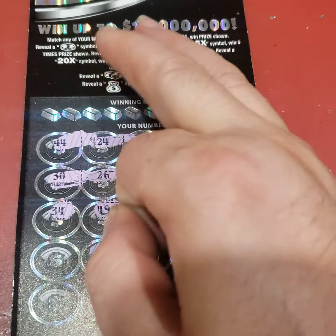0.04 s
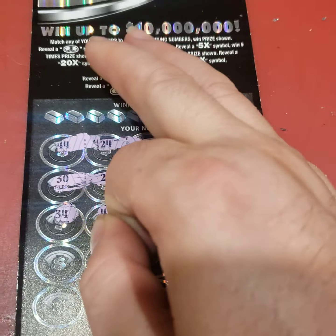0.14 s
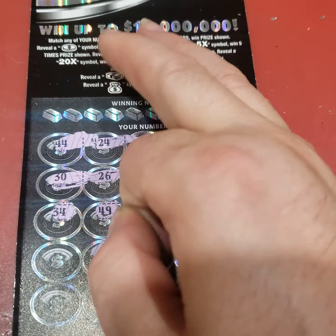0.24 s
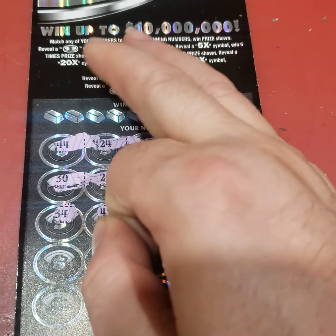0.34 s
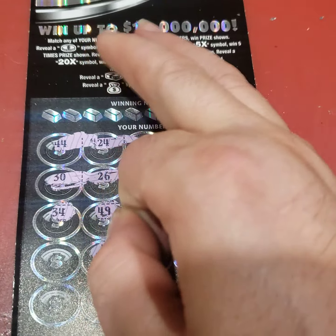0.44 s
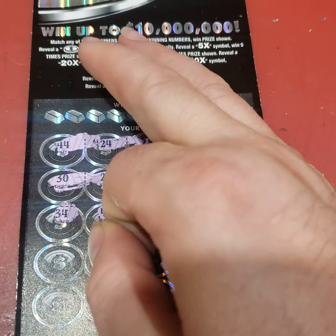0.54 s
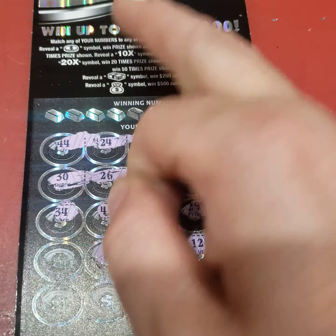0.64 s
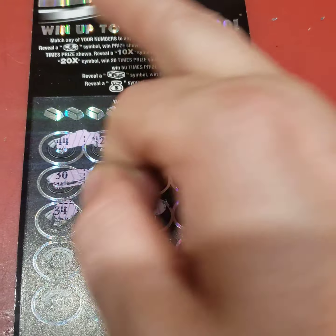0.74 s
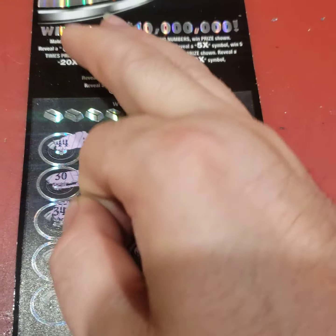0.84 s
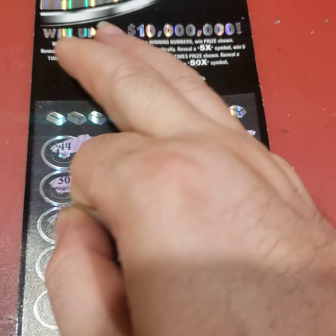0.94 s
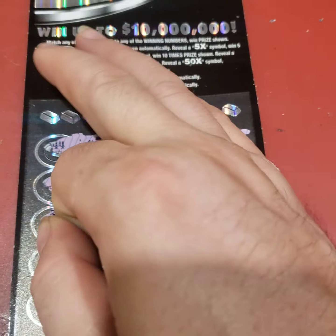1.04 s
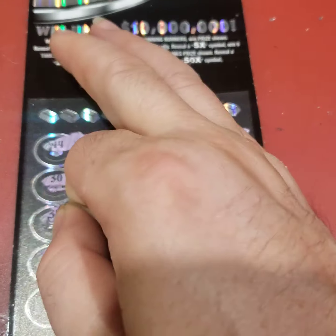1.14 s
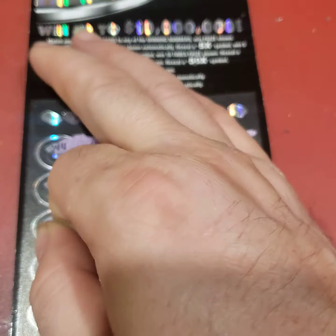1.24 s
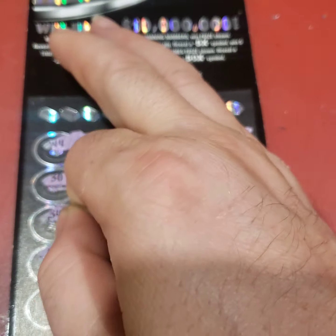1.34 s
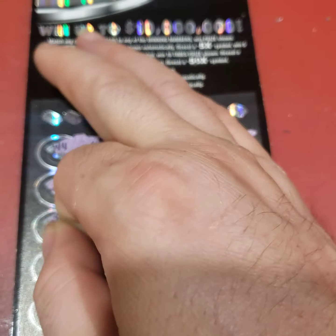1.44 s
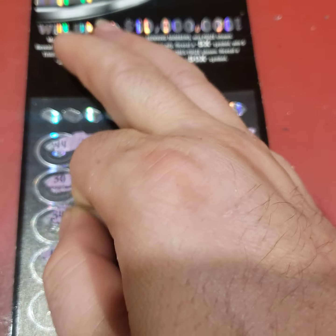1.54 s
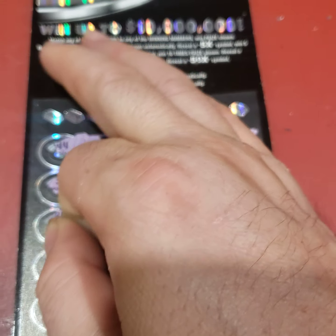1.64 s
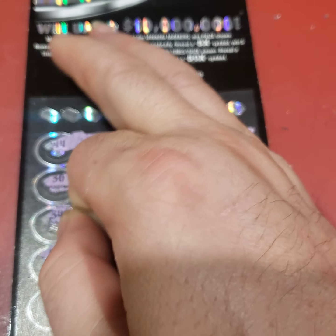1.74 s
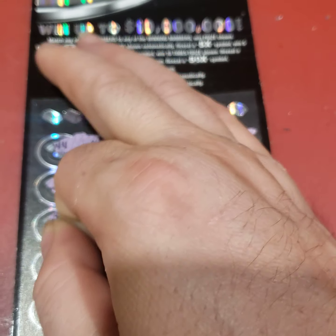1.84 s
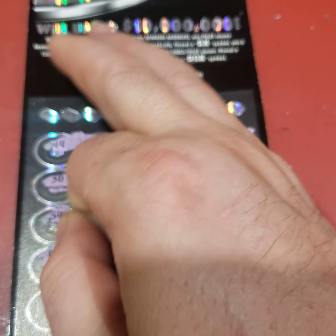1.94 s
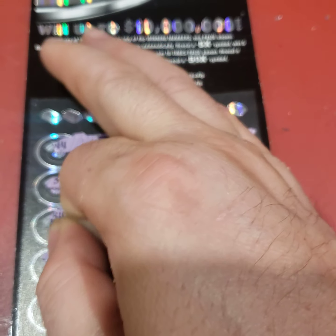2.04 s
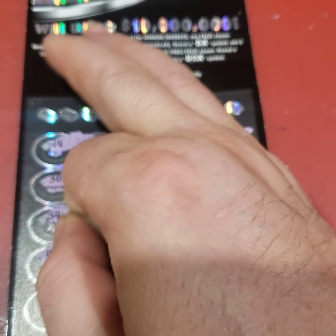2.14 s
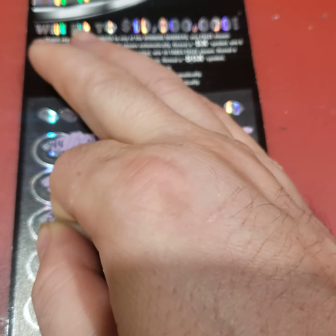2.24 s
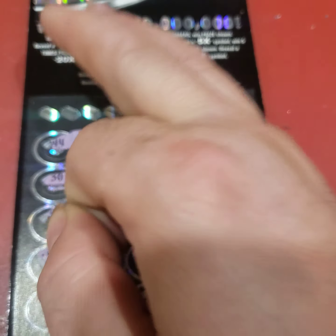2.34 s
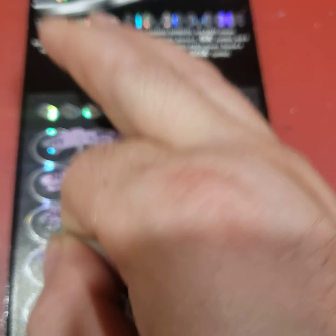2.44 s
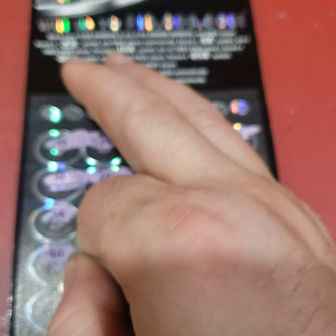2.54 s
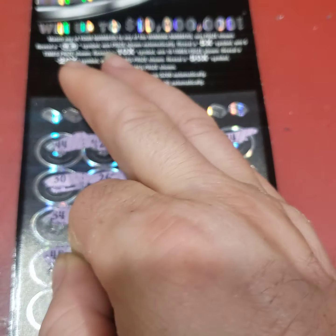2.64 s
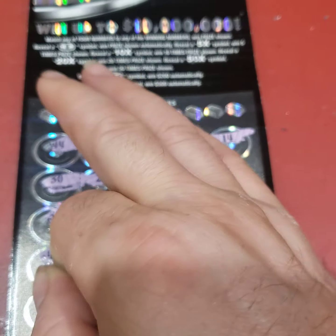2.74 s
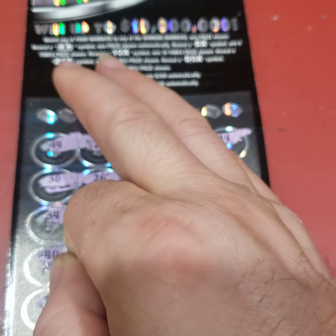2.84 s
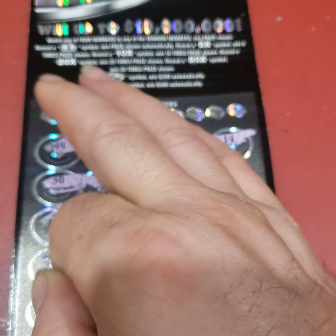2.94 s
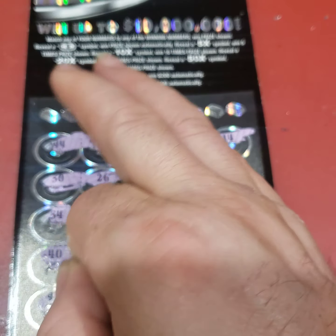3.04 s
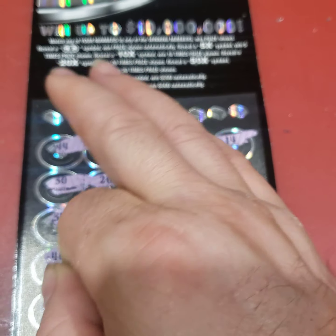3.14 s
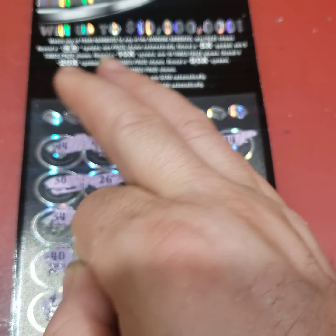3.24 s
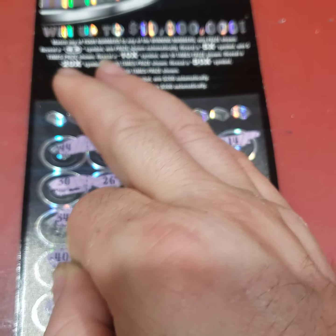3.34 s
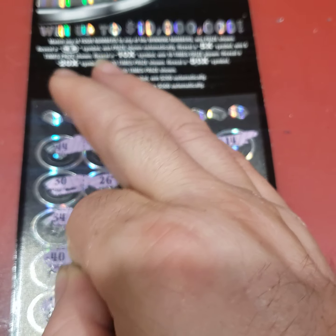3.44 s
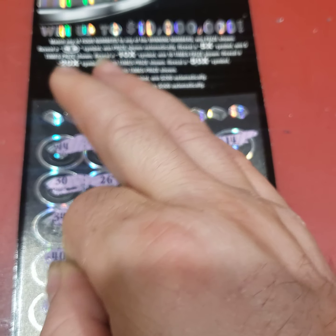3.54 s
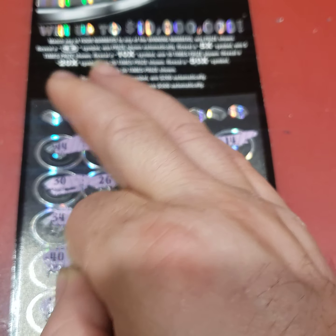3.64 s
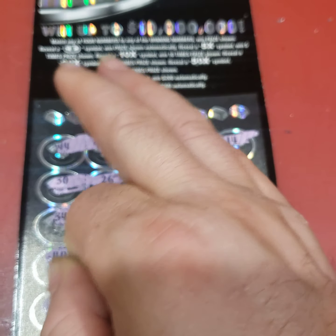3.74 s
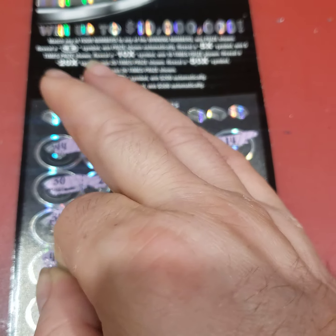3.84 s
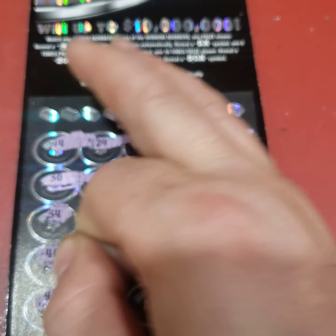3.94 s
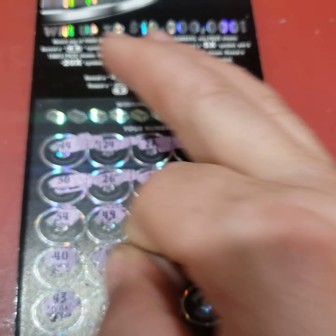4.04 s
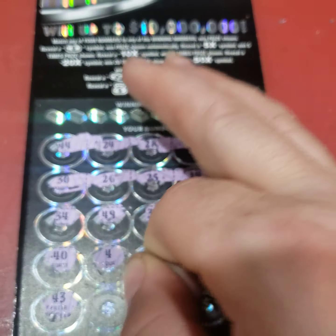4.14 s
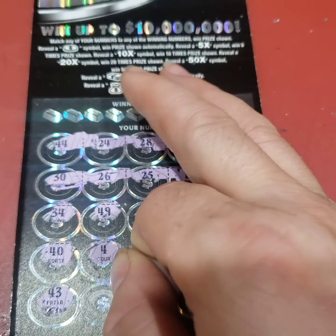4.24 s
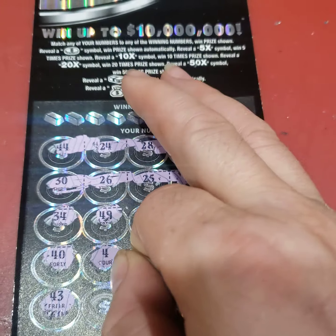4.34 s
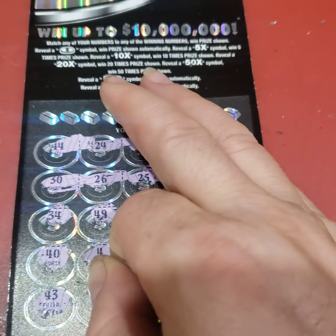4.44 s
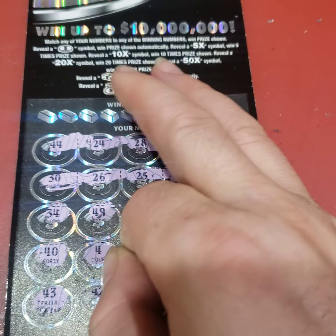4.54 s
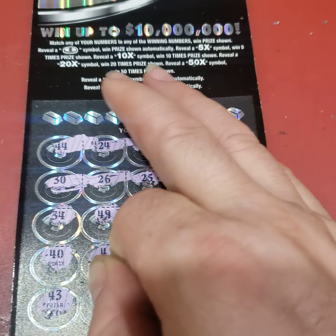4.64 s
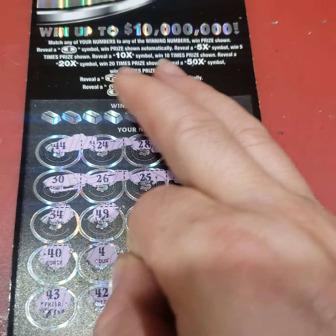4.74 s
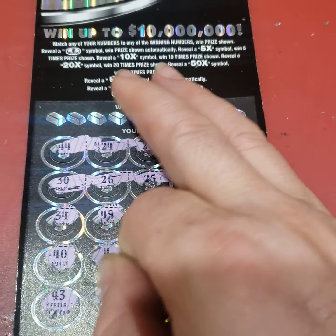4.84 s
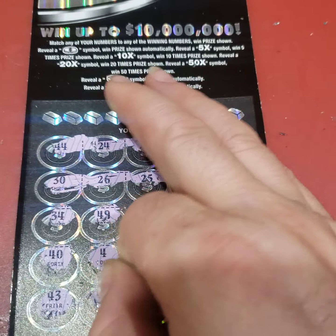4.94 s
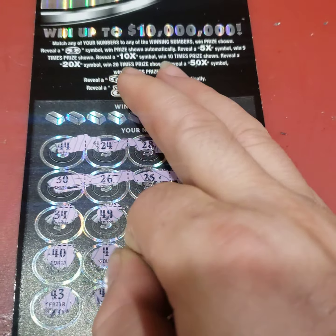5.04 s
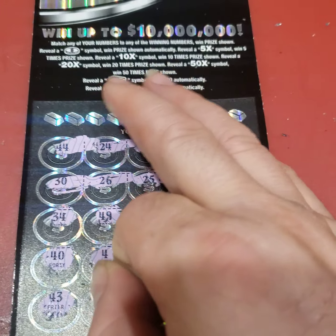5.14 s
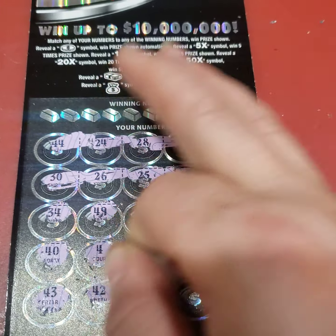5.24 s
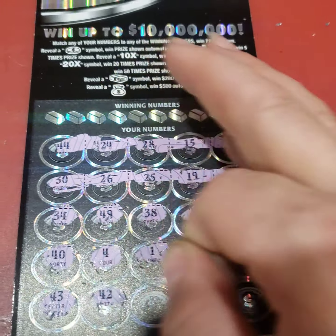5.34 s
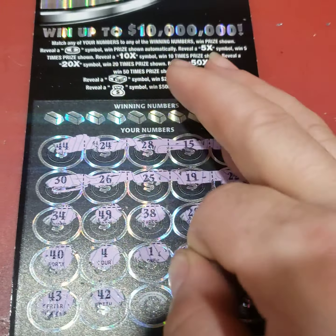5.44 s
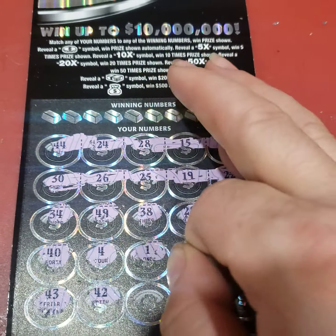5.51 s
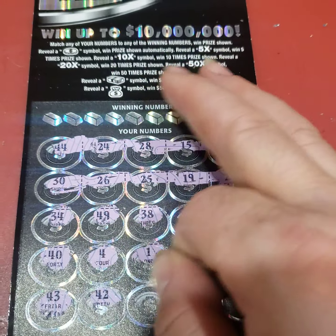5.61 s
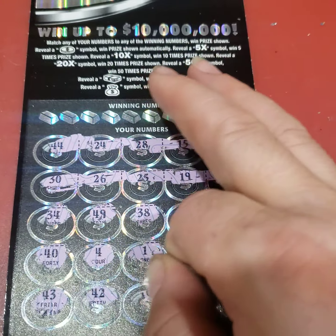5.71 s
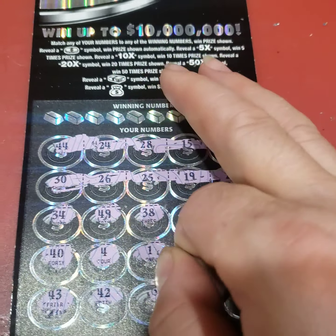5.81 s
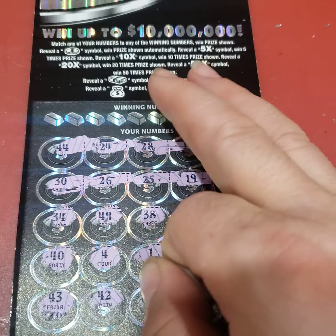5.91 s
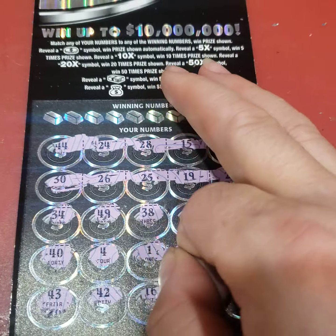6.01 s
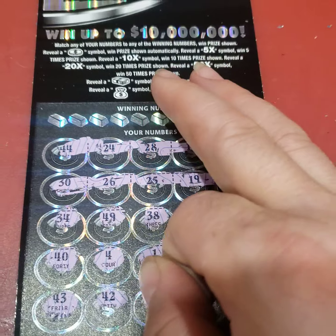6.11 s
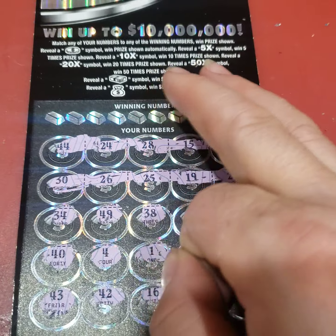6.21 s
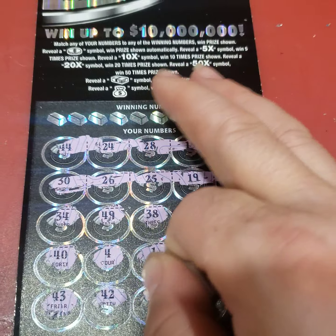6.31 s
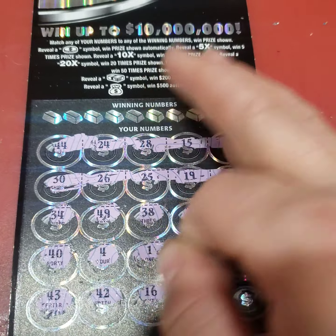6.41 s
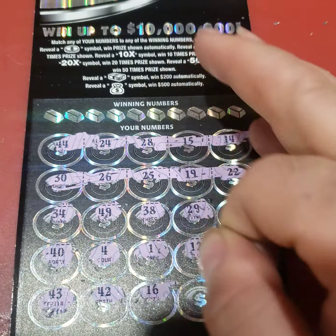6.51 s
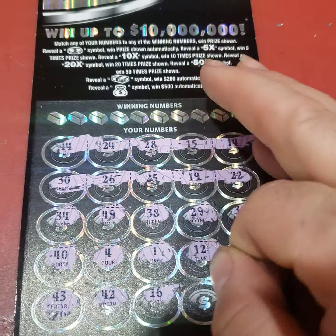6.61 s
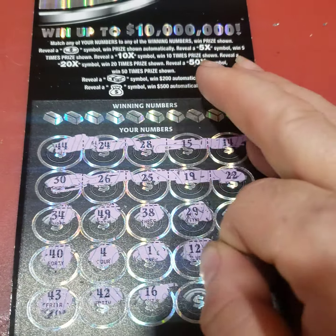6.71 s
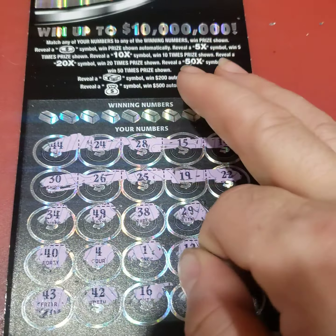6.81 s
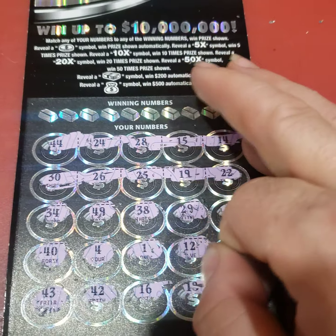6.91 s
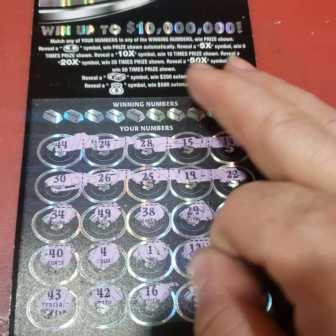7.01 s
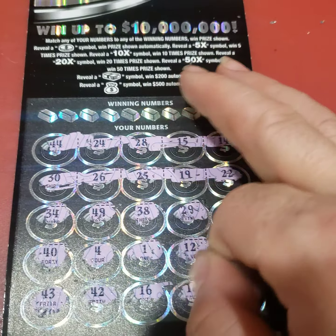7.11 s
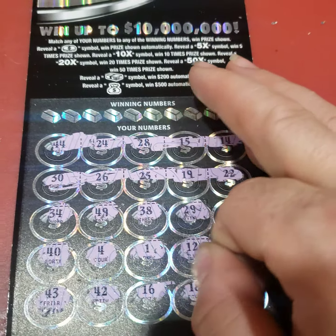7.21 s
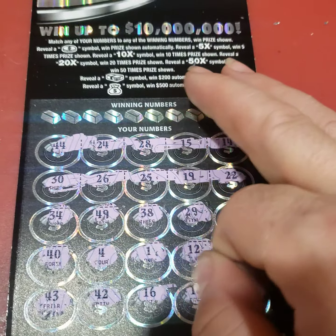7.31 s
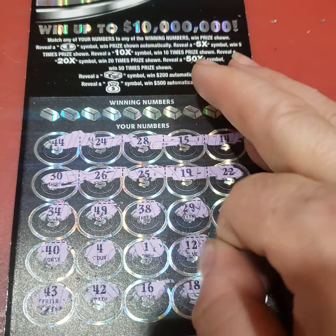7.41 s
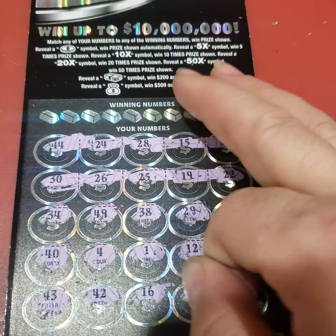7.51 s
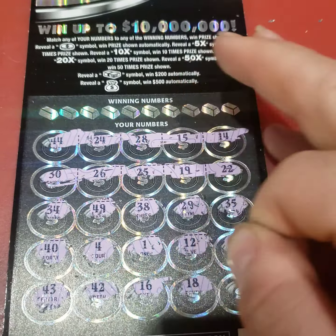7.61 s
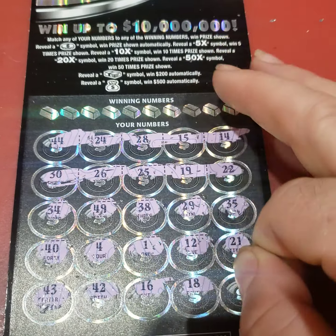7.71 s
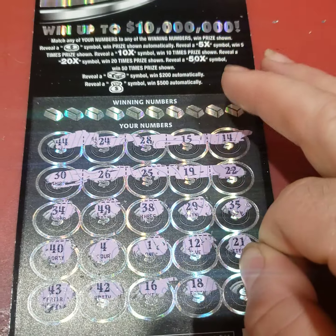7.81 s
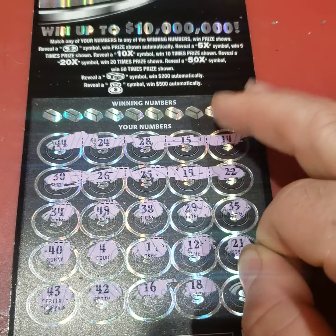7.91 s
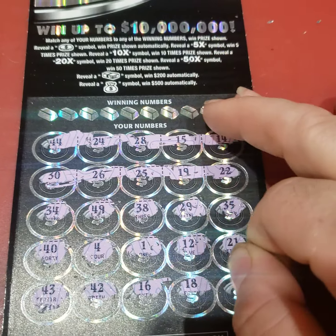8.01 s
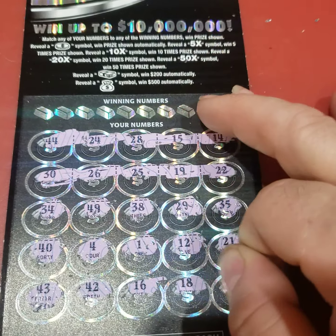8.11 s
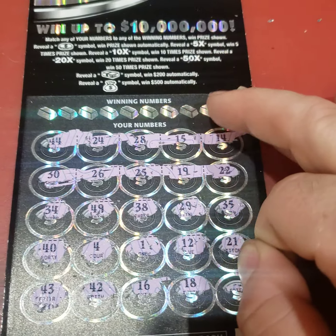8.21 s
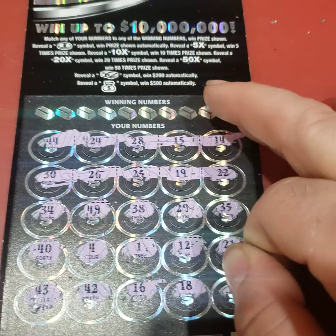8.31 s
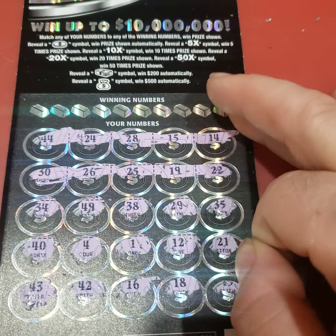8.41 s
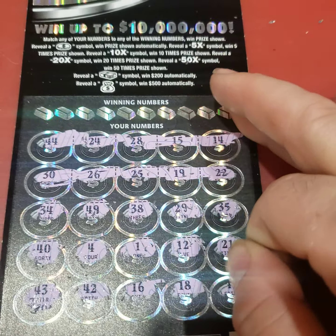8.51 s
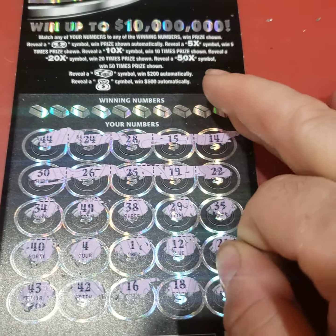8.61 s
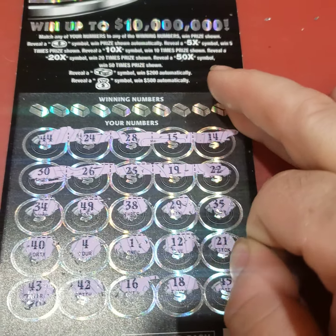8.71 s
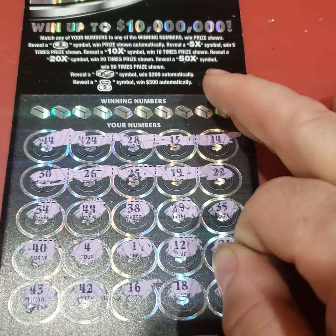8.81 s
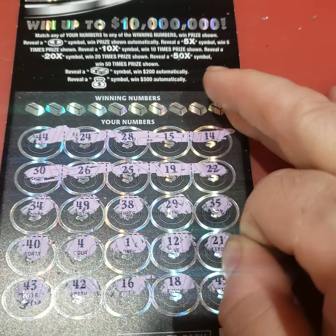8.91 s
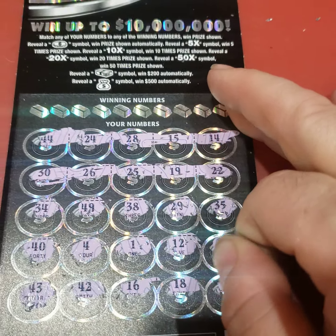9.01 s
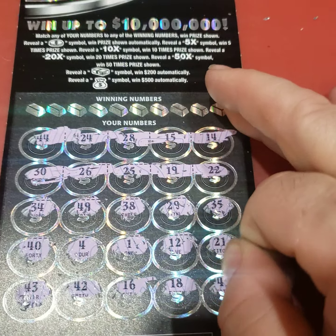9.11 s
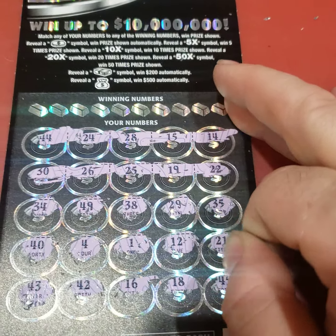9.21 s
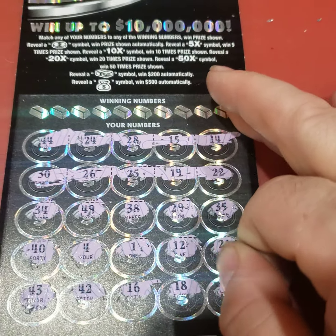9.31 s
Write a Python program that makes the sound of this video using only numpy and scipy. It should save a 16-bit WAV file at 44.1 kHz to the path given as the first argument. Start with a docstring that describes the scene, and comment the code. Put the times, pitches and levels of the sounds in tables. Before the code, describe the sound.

A coin scrapes a scratch card on a table, close in stereo, in a small quiet room with a short echo and faint low hum. Scratching is already under way and stops near 0.6 s. Further bouts run about 1.0-2.3, 2.65-3.9, 4.4-5.2, 5.6-6.4, 6.8-7.5 and 8.1-9.3 s, each made of rapid alternating strokes of roughly a tenth of a second. Every stroke shakes a low, woody table rumble under a dry rasp and thin crumbling hiss, brightest on the left, with some edge ringing. The hiss is stronger around 5 and 6.2 s. Brief judders start bouts near 2.7, 5.7, 6.8 and 8.1 s. Little knocks and fine clicks are scattered throughout. Soft hand swishes come near 0.1, 3.4, 5.3 and 6.1 s, with dull thuds at 5.1, 6.15 and 6.4 s. The last bout is patchier, with weak strokes between stronger ones.

```python
"""A coin scrapes the coating off a scratch card on a table, in quick to-and-fro strokes, column after column.
Random tiny slips shake the table top and make the card rasp; the crumbling coating hisses, mostly on the left.
The coin rings at its edge, knocks as it lands, judders as it digs in and clicks over flakes.
The hand thuds softly and swishes over the card; a small room echoes and hums quietly."""
import sys
import numpy as np
from scipy import signal
from scipy.fft import rfft, irfft, next_fast_len
from scipy.io import wavfile
from scipy.ndimage import uniform_filter1d

SR = 44100
rng = np.random.default_rng(int(sys.argv[2]) if len(sys.argv) > 2 else 0)


def generate_wav(signal):
    """Clip the signal to [-1, 1] and save it as 16-bit WAV at the path in sys.argv[1]."""
    frames = np.transpose(np.atleast_2d(signal))
    scaled = np.clip(frames, -1, 1) * 32767
    pcm = np.round(scaled).astype(np.int16)
    wavfile.write(sys.argv[1], SR, pcm)


N = 412758
TIME = np.arange(N) / SR
SIZE = next_fast_len(N + SR // 2, True)  # leaves room for the echoes to die away
HZ = np.maximum(np.fft.rfftfreq(SIZE, 1 / SR), 1)
CUTOFF_HZ = 15900


def from_db(db):
    """Turn decibels into gain."""
    return 10 ** (np.asarray(db) / 20)


def rms_one(x):
    """Scale to an rms of 1."""
    return x / np.sqrt(np.mean(x ** 2))


def over_hz(points):
    """Join (f/Hz, value) points by straight lines on a log-frequency axis."""
    hz, value = np.transpose(points)
    return np.interp(np.log(HZ), np.log(hz), value)


def body(spectrum):
    """Make a causal (minimum-phase) response of unit power that falls away beyond the ends of the spectrum."""
    low_skirt = np.minimum(HZ / spectrum[0][0], 1) ** 2
    high_skirt = np.minimum(spectrum[-1][0] / HZ, 1) ** 4
    gain = rms_one(from_db(over_hz(spectrum)) * low_skirt * high_skirt)
    cepstrum = irfft(np.log(gain), SIZE)
    # folding the cepstrum onto positive times makes the response causal
    cepstrum[1:SIZE // 2] *= 2
    cepstrum[SIZE // 2 + 1:] = 0
    return np.exp(rfft(cepstrum))


def drift(per_s):
    """Wander at random with rms 1, through this many turning points a second."""
    knots = rng.standard_normal(SR // 10)
    return rms_one(np.interp(TIME * per_s, np.arange(len(knots)), knots))


def filtered(x, order, hz, kind):
    """Apply a Butterworth filter."""
    return signal.sosfilt(signal.butter(order, hz, kind, fs=SR, output="sos"), x)


# spectrum of the quiet room: (f/Hz, relative level/dB per Hz)
AIR = [(30, -20.5), (58, -3.5), (105, -11.5), (212, -0.5), (489, -11.5), (775, -26), (1330, -35),
       (2400, -43), (8360, -49), (14800, -34.5), (16000, -33)]
AIR_DB = -55


def room_air():
    """The quiet room is steady noise with most of its power in the low hum."""
    return from_db(AIR_DB) * rfft(rng.standard_normal((2, SIZE))) * body(AIR)


def room(t60, gap_s):
    """Diffuse reflections are decaying noise, different on each side, after a short gap."""
    age = TIME[:SR // 2]
    tail = rng.standard_normal((2, SR // 2))
    fade = from_db(-60 * age / t60) * (age > gap_s)
    return rfft(tail * fade / np.linalg.norm(fade), SIZE)


def reflections(sound, t60, gap_s):
    """The moving hand keeps shifting the room's reflections between two patterns."""
    turn = np.pi / 2 * drift(per_s=9)
    one, other = (irfft(sound * room(t60, gap_s), SIZE)[:, :N] for _ in range(2))
    return rfft(one * np.cos(turn) + other * np.sin(turn), SIZE)


# left minus right level, before each sound takes its share: (f/Hz, level/dB)
BALANCE_DB = [(330, -2.5), (500, 4), (770, 11), (1600, -1.5), (4100, 19.5), (6400, 30), (10000, 11.5),
              (14500, 22.5)]
# likeness of left and right: (f/Hz, correlation)
LIKENESS = [(60, 0.59), (130, 0.96), (330, 0.95), (600, 1), (1200, 0.62), (2000, 0.47), (3300, 0.011)]
# how far the left microphone's phase is ahead: (f/Hz, phase/rad)
LEAD = [(150, 0.052), (350, 0.66), (520, 1.77), (780, 0.11), (1030, 1.67), (1460, 0.12), (1810, 0.96)]


def microphones(families, lean_share):
    """Two microphones hear the two families of modes in different mixtures; the left one is brighter."""
    alike, lead = np.clip(over_hz(LIKENESS), -1, 1), over_hz(LEAD)
    lean = from_db(lean_share * over_hz(BALANCE_DB) / 2)
    mid = np.sqrt(1 + alike) * families[0]
    side = np.sqrt(1 - alike) * families[1]
    left = (mid + side) * lean * np.exp(1j * lead)
    right = (mid - side) / lean
    # keeps the power of the sum of both sides steady
    return np.array([left, right]) / np.sqrt((lean ** 2 + lean ** -2 + 2 * alike * np.cos(lead)) / 2)


# the hand slides over the card, and the first row adds a brief bright swell of noise to the opening stroke:
# (start t/s, end t/s, level/dB before a common boost)
SWISHES = [(0.045, 0.117, -55.5), (3.39, 3.532, -58.5), (5.308, 5.42, -65), (6.022, 6.186, -54)]
# spectrum of skin on card: (f/Hz, relative level/dB per Hz)
SKIN = [(600, 22), (1700, 2.5), (2900, 7.5), (3800, -4), (5500, 0.5)]


def swishes(level_db):
    """Skin gliding over the card gives a soft, smooth swell of noise."""
    swell = 0
    for start, end, db in SWISHES:
        rise_and_fall = np.interp(TIME, [start, (start + end) / 2, end], [0, 1, 0])
        swell = swell + from_db(db + level_db) * rise_and_fall ** 0.57
    return rfft(swell * rng.standard_normal((2, N)), SIZE) * body(SKIN)


# the heel of the hand thuds on the table: (t/s, level/dB at the top of the swell)
THUDS = [(5.14, -44), (6.145, -38.5), (6.368, -40.5)]


def thuds(low_hz, high_hz, rise_s):
    """The soft heel of the hand makes low noise in the table that swells and dies away."""
    rumble = filtered(rng.standard_normal((2, N)), 2, [low_hz, high_hz], "band")
    swell = 0
    for s, db in THUDS:
        age = np.maximum(TIME - s, 0) / rise_s
        swell = swell + from_db(db) * age * np.exp(1 - age)
    return rms_one(rumble) * swell


# the coin's edge snaps over a flake or the card crackles: (t/s, level/dB before a common cut, centre f/Hz)
TICKS = [(0.653, -25, 14400), (0.6955, -23.5, 15200), (0.867, -41, 4000), (0.9532, -40, 5500),
         (2.384, -23, 14900), (2.558, -33, 3460), (2.636, -36.5, 6330), (3.183, -17.5, 14750),
         (3.2907, -17.5, 14300), (3.418, -23, 14300), (4.0466, -17, 13700), (4.217, -30, 5200),
         (4.336, -25, 14700), (5.546, -36, 6660), (6.515, -27, 15100), (6.707, -39.5, 5400),
         (7.4832, -28, 4100), (7.763, -29, 15400), (7.7788, -27, 6640), (8.1348, -27, 9340),
         (8.3492, -24.5, 11270)]


def ticks(level_db, rise_s, decay_s, octave_wide_hz, low_hz, ring_hz, ring_q, ring_db):
    """Each snap is a short noise burst round one pitch, the higher the broader; the card rings briefly with it."""
    out, age = np.zeros((2, N)), TIME[:SR // 50]
    for s, db, hz in TICKS:
        half_width = 2 ** (hz / octave_wide_hz / 2)  # a frequency ratio
        edges = np.minimum([hz / half_width, hz * half_width], .45 * SR)
        swell = (1 - np.exp(-age / rise_s)) * np.exp(-age / decay_s)
        burst = filtered(rng.standard_normal((2, len(age))) * swell, 1, edges, "band")
        at = int(s * SR)
        out[:, at:at + len(age)] += from_db(db + level_db) * rms_one(burst)
    ring = signal.lfilter(*signal.iirpeak(ring_hz, ring_q, fs=SR), out)
    return filtered(out + from_db(ring_db) * ring, 2, low_hz, "high")


# the coin lands or bites: (t/s, level/dB before a common boost)
KNOCKS = [(0.17, -33), (0.365, -32.5), (0.971, -34.5), (2.085, -31), (2.667, -37.5), (3.177, -27),
          (3.599, -30.5), (4.345, -41.5), (4.431, -36.5), (4.876, -34), (5.933, -30.5), (6.647, -38.5),
          (6.715, -40), (7.053, -31), (7.772, -37), (8.061, -38), (9.282, -34)]


def knocks(level_db, bounce_s, bounce_db):
    """The coin gives one push as it lands, and a slightly weaker rebound a few milliseconds later."""
    force = np.zeros((2, N))
    chances = rng.uniform(-0.97, 1, (len(KNOCKS), 2))
    for (s, db), (turn, late) in zip(KNOCKS, chances):
        push = from_db(db + level_db) * np.array([1, turn])  # turn: share of the second family of modes
        rebound_s = s + bounce_s * (1 + late / 2)
        force[:, int(s * SR)] -= push
        force[:, int(rebound_s * SR)] -= push * from_db(bounce_db)
    return force


# the coin judders as it digs into a fresh column: (start t/s, length t/s, level/dB before a common boost)
JUDDERS = [(2.728, 0.064, -27), (5.658, 0.054, -28), (6.792, 0.091, -24.5), (8.077, 0.042, -23.5)]


def judders(slip_hz, wander, level_db):
    """The coin sticks and slips almost regularly, near the table's main resonance, as its effort fades."""
    cycles = np.floor(np.cumsum(slip_hz * np.exp(wander * drift(per_s=70))) / SR)
    pushes = np.diff(cycles, prepend=0) * (1 + rng.standard_normal((2, N)) / 3)  # one per cycle
    effort = 0
    for s, length, db in JUDDERS:
        bite = np.interp(TIME, [s, s + length / 10, s + length], [0, 1, 0])
        effort = effort + from_db(db + level_db) * bite
    return pushes * effort


def slips(per_s, spread_db, steady_s):
    """Random tiny slips drive two families of modes; the hand holds their mean force steady."""
    born = rng.random(N) < per_s / SR
    force = born * from_db(spread_db * rng.exponential(1, N)) * rng.standard_normal((2, N))
    power = uniform_filter1d(force ** 2, int(steady_s * SR), axis=-1)
    return force / np.sqrt(np.abs(power) + 1e-5)


def edge_echo(force, delay_s, wander, strength):
    """Bending waves return from the card's edge; their delay drifts, so the colour keeps shifting."""
    late = TIME - delay_s * np.exp(wander * drift(per_s=9))
    back = np.array([np.interp(late, TIME, family) for family in force])
    return (force + strength * back) / np.sqrt(1 + strength ** 2)


# the table top under the hand: (f/Hz, relative level/dB per Hz)
TABLE = [(40, -39.5), (60, -10.5), (76, -20), (94, -9), (120, -16), (195, -8.5), (235, -3.5), (275, -6),
         (325, -3.5), (362, 1.5), (430, -3), (480, -12.5), (600, -18), (800, -44.5)]


def table_top(friction, level, blows):
    """Friction and blows shake the table top, which sounds in its own low modes."""
    rubbing = edge_echo(friction, delay_s=0.00714, wander=0.198, strength=0.34) * level
    return rfft(rubbing + blows, SIZE) * body(TABLE)


# where the coin works: (t/s, place across the card: 0 left, 1 middle, 2 right)
PLACE = [(.7, .6), (.95, 0), (2.5, 0), (2.8, .4), (4, .4), (4.4, 1), (5.4, 1), (5.6, 1.8), (6.4, 1.8),
         (6.8, 2)]


def coin_place():
    """The coin moves across the card along straight lines in time."""
    return np.interp(TIME, *np.transpose(PLACE))


def across_card(force, place, spectra):
    """The card's colour changes with the place where the coin presses."""
    out = 0
    for k, spectrum in enumerate(spectra):
        share = np.sqrt(np.maximum(1 - np.abs(place - k), 0))
        out = out + rfft(force * share, SIZE) * body(spectrum)
    return out


# card rasp with the coin at the left, middle and right: (f/Hz, relative level/dB per Hz)
RASP_LEFT = [(480, -6.5), (620, -1.5), (820, 2), (1100, -9), (1750, -12.5), (2100, -35.5), (2400, -49.5)]
RASP_MIDDLE = [(480, -17), (620, 4.5), (950, 0.5), (1250, -4), (1620, -0.5), (2150, -19), (2400, -30)]
RASP_RIGHT = [(480, -17.5), (660, 5.5), (950, -2.5), (1120, -7.5), (1330, -5), (1750, -13.5), (2150, -26.5)]


def card_rasp(friction, level, blows, place):
    """Slips under the coin, and softened blows, make the card rasp."""
    scraping = edge_echo(friction, delay_s=0.00237, wander=0.24, strength=0.4) * level
    padded = filtered(blows, 2, 1100, "low")  # the card cushions the landing
    force = scraping + padded * from_db(-12.0)
    return across_card(force, place, [RASP_LEFT, RASP_MIDDLE, RASP_RIGHT])


def flakes(per_s, level_db):
    """Now and then a larger flake breaks away in a crackle that fades in a few milliseconds."""
    breaks = (rng.random(N) < per_s / SR) * rng.random(N)
    fade = np.exp(-1 / (0.0037 * SR))  # per sample
    return from_db(level_db) * signal.lfilter([1], [1, -fade], breaks + 1e-18)


def shifting_colour(force, depth_db, per_s, count=12):
    """The patch of coating under the edge keeps changing, so each band of the hiss swells and fades alone."""
    spectrum, out = rfft(force, SIZE), 0
    centres, step = np.linspace(0, CUTOFF_HZ, count, retstep=True)
    for hz in centres:
        window = np.maximum(1 - np.abs(HZ - hz) / step, 0)
        band = irfft(spectrum * window, SIZE)[:, :N]
        out = out + band * rms_one(from_db(depth_db * drift(per_s)))
    return out


# coating hiss with the coin at the left, middle and right: (f/Hz, relative level/dB per Hz)
HISS_LEFT = [(1900, -22), (2600, -4), (3500, -19.5), (4100, -8.5), (6500, -8.5), (8200, -13.5), (11000, -5),
             (13500, -1.5), (16000, -6.5)]
HISS_MIDDLE = [(1900, -37), (2700, -14.5), (3900, -4.5), (4900, -8.5), (6500, -0.5), (7400, -5),
               (8600, -19), (11500, -7.5), (13500, -4.5), (16000, -0.5)]
HISS_RIGHT = [(2700, -7), (3500, -4.5), (4200, -4.5), (4850, -5), (6300, -3.5), (8400, -15), (9900, -8.5),
              (12400, -11.5), (16000, -5)]


def coating_hiss(crumbling, level, place):
    """The dense slips of the crumbling coating make a hiss of shifting colour."""
    flaking = shifting_colour(crumbling, depth_db=3.5, per_s=16) * level
    return across_card(flaking, place, [HISS_LEFT, HISS_MIDDLE, HISS_RIGHT])


# strokes of the coin, out and back in turn:
# (start t/s, length t/s, force level/dB, weight of the hand on the table level/dB)
STROKES = [(-0.012, 0.047, 0, -3), (0.031, 0.091, 7.5, -1.5), (0.132, 0.091, 1.5, -5.5),
           (0.246, 0.098, -2.5, -3), (0.353, 0.082, -1, -1.5), (0.469, 0.06, -0.5, -4.5),
           (0.543, 0.08, 1.5, -4), (0.969, 0.15, 4, -2), (1.124, 0.1, 4, -2), (1.229, 0.1, 3, -2),
           (1.331, 0.11, 5, -3), (1.434, 0.098, -2, -2.5), (1.536, 0.1, 0.5, -4.0), (1.649, 0.097, 3.5, 2),
           (1.75, 0.076, -18, -8), (1.845, 0.11, -6.0, -1), (1.961, 0.038, 0, -2.5), (2.075, 0.077, -1, -3),
           (2.168, 0.063, -3.5, -1.5), (2.253, 0.063, -1.5, -6.5), (2.648, 0.052, -14, -9),
           (2.68, 0.081, -15.5, -1), (2.733, 0.079, 4.5, 0), (2.826, 0.1, 2, 1.5), (2.941, 0.087, 1.5, 0.5),
           (3.023, 0.15, 2.5, 0.5), (3.146, 0.11, -5, -4), (3.255, 0.11, 2.5, 3), (3.37, 0.094, 2.5, 2),
           (3.484, 0.068, -1, 1), (3.567, 0.12, -5, -1), (3.67, 0.1, -18.5, -3), (3.774, 0.083, -3, 3.5),
           (4.43, 0.09, 3.5, -0.5), (4.535, 0.1, 0.5, 0), (4.656, 0.073, 6, -2.5), (4.74, 0.11, 3.5, -0.5),
           (4.857, 0.12, -5, -3.5), (4.973, 0.11, -12.5, -4.5), (5.103, 0.12, -4, -2),
           (5.611, 0.16, 1, 0.5), (5.751, 0.097, -0.5, 2.5), (5.883, 0.086, 0.5, -0.5),
           (5.977, 0.11, -1.5, -1), (6.082, 0.12, -3, -2), (6.201, 0.12, -6, -4.5),
           (6.323, 0.079, -0.5, 0.5), (6.763, 0.12, 0.5, 2), (6.902, 0.11, 2.5, 1), (7.036, 0.086, 6.5, -2),
           (7.142, 0.094, 3, -1.5), (7.254, 0.076, 0, -1), (7.379, 0.071, -3.5, -1.5),
           (7.466, 0.1, -0.5, -1), (8.06, 0.095, 0.5, -2), (8.176, 0.09, 4, 0.5), (8.298, 0.072, 5.5, -2.5),
           (8.423, 0.077, -1.5, -0.5), (8.538, 0.086, 2.5, -1.5), (8.692, 0.075, -25, -1.5),
           (8.804, 0.096, -3.5, 1.5), (8.895, 0.13, -20.5, -3), (9.036, 0.082, 2, -1.5),
           (9.143, 0.11, -25, -3.5), (9.269, 0.076, 7, 0)]
# bouts of scratching, about one column of numbers each, end at these times: (t/s)
BOUT_ENDS = [0.61, 2.31, 3.866, 5.25, 6.421, 7.574, 9.345]


def bouts():
    """Group the strokes by bout."""
    starts = [-np.inf] + BOUT_ENDS
    return [[row for row in STROKES if first <= row[0] < last] for first, last in zip(starts, BOUT_ENDS)]


def coin_tilt():
    """The coin rocks between strokes: 0 in the middle of an out stroke, 1 in the middle of a back stroke."""
    turns = [(start + length / 2, k % 2) for bout in bouts() for k, (start, length, _, _) in enumerate(bout)]
    return np.interp(TIME, *np.transpose(turns))


# resonances of the coin's edge: (f/Hz, width f/Hz, level/dB against the rasp at the card's left,
# change on a back stroke level/dB, change per step to the right level/dB)
COIN_EDGE = [(1814, 270, -21.5, 9, -4), (4100, 420, -79, -2, 31.5), (12750, 2300, -13.5, -5, -12)]


def coin_edge(force, place, tilt_rise, wander):
    """The scraping edge has a few resonances; pitch and strength follow its tilt, strength also its place."""
    tilt, out = coin_tilt(), 0
    stretch = 1 + tilt_rise * (tilt - .5) + wander * drift(per_s=14)
    for hz, width_hz, db, back_db, rightward_db in COIN_EDGE:
        # slow noise on a carrier makes a narrow band round the carrier's pitch
        ringing = rms_one(filtered(force, 2, width_hz / 2, "low"))
        carrier = np.sqrt(2) * np.cos(2 * np.pi * np.cumsum(hz * stretch) / SR)
        out = out + ringing * (carrier * from_db(db + back_db * tilt + rightward_db * place))
    return out


# after a bout the coin skims on to the next column: level of table, card rasp and coating hiss (level/dB)
SKIM_DB = [-50.5, -62, -78.5]
SKIM_S, SKIM_UNEVEN_DB = 0.14, 9


def skim_levels():
    """When a bout ends the coin skims unevenly over the card and lifts off."""
    contact = sum(np.interp(TIME - end, [-SKIM_S / 10, 0, SKIM_S], [0, 1, 0]) for end in BOUT_ENDS)
    return from_db(SKIM_DB)[:, None] * contact * from_db(SKIM_UNEVEN_DB * drift(per_s=27))


# how table, card rasp and coating hiss (one row each) answer a stroke: (level/dB, share of the stroke's force,
# change on a back stroke level/dB, change in mid-bout level/dB)
RESPONSE = [(-33, 0.24, -2.5, -2), (-45, 0.83, 1.33, 0.5), (-58, 1, 3, 0)]
# how each of them swells within a stroke: (power of the coin's speed, skew: below 1 it peaks early)
SWELL = [(.8, 1), (1.35, 0.96), (1.55, 1)]
# how much fresh coating the coin meets, heard in the hiss: (t/s, level/dB)
COATING_DB = [(0.6, -4), (1.3, -2.5), (1.9, -4.5), (3.3, -0.5), (3.8, 0), (4.5, -0.5), (5.15, 2.5),
              (5.85, 0), (6.2, 4.5), (7.2, -1), (7.45, -5), (9.3, -4)]


def stroke_levels():
    """Each stroke speeds up and stops; the brighter the sound, the faster it grows with speed.
    The hand leans on the table most on the out strokes and at both ends of a bout."""
    power = np.zeros((3, N))
    level_db, force_share, back_db, mid_bout_db = np.transpose(RESPONSE)
    growth, skew = np.transpose(SWELL)[:, :, None]
    for bout in bouts():
        for k, (start, length, force_db, weight_db) in enumerate(bout):
            back = k % 2
            swing = np.sin(np.pi * k / (len(bout) - 1))  # 1 in mid-bout
            coating_db = np.interp(start + length / 2, *np.transpose(COATING_DB))
            levels_db = level_db + force_share * force_db + back * back_db + swing * mid_bout_db
            levels_db = levels_db + [weight_db, 0, coating_db]
            span = slice(max(int(start * SR), 0), int((start + length) * SR))
            progress = np.clip((TIME[span] - start) / length, 0, 1)
            speed = np.abs(np.sin(np.pi * progress ** skew))
            power[:, span] += (from_db(levels_db)[:, None] * speed ** growth) ** 2
    return np.sqrt(power)


def scene():
    """Friction and knocks drive table and card; flakes add hiss and ticks; the room answers."""
    table_level, rasp_level, hiss_level = np.hypot(stroke_levels(), skim_levels())
    place = coin_place()
    grip_db = 2.34 * drift(per_s=70)  # the coating comes off in uneven patches
    friction = slips(per_s=2600, spread_db=2.5, steady_s=.02) * from_db(grip_db)
    crumble_db = grip_db + 2.12 * drift(per_s=140)
    crumbling = slips(per_s=30000, spread_db=3.5, steady_s=0.021) * from_db(crumble_db)
    crumbling = crumbling * (1 + flakes(per_s=40, level_db=5.0))
    blows = knocks(level_db=24.0, bounce_s=0.00607, bounce_db=-0.5)
    blows = blows + judders(slip_hz=333.3, wander=.1, level_db=16.5)

    table = table_top(friction, table_level, blows)
    table = table + rfft(thuds(low_hz=65.6, high_hz=120, rise_s=0.017), SIZE)
    rasp = card_rasp(friction, rasp_level, blows, place)
    hiss = coating_hiss(crumbling, hiss_level, place) + swishes(level_db=6.5)
    edge = rfft(coin_edge(crumbling, place, tilt_rise=0.033, wander=0.022) * rasp_level, SIZE)
    snaps = rfft(ticks(level_db=-33.0, rise_s=0.00086, decay_s=0.0025, octave_wide_hz=12700,
                       low_hz=1490, ring_hz=3830, ring_q=8.3, ring_db=-1.0), SIZE)

    to_room = table * from_db(-9.0) + (rasp + edge) * from_db(-11) + (hiss + snaps) * from_db(-6.5)
    echoes = reflections(to_room, t60=0.18, gap_s=0.00527)
    # the more diffuse a sound, the more evenly it reaches both microphones
    heard = microphones(table + rasp + edge + hiss + snaps, lean_share=0.93)
    heard = heard + microphones(echoes, lean_share=0.78) + microphones(room_air(), lean_share=0.27)
    return irfft(heard, SIZE)[:, :N]


def record(dry):
    """Cut the top steeply above the cutoff."""
    steep_cut = np.sqrt(1 + (HZ / CUTOFF_HZ) ** 300)
    return irfft(rfft(dry, SIZE) / steep_cut, SIZE)[:, :N]


dry = scene()
out = record(dry)
generate_wav(out)
```